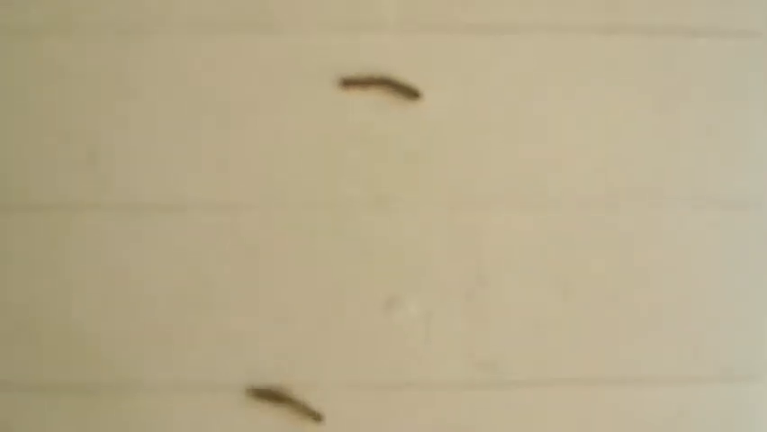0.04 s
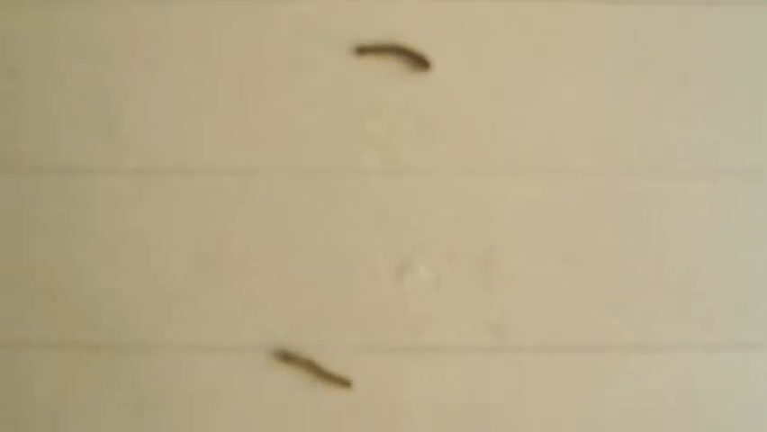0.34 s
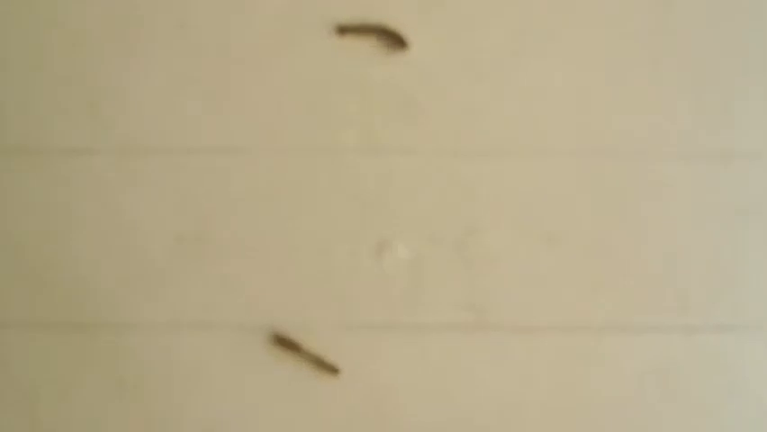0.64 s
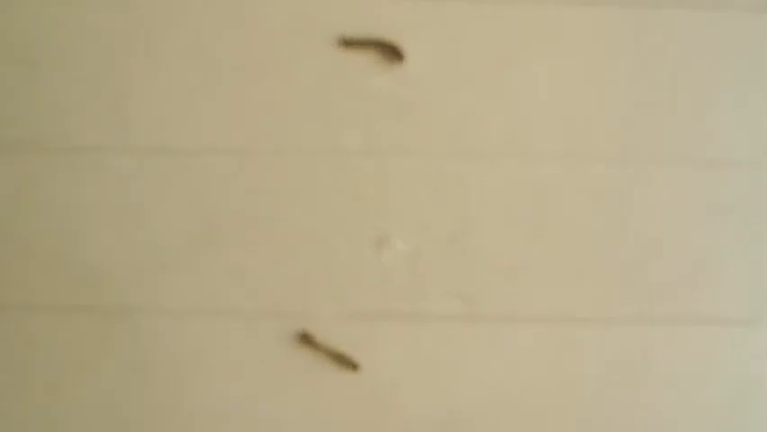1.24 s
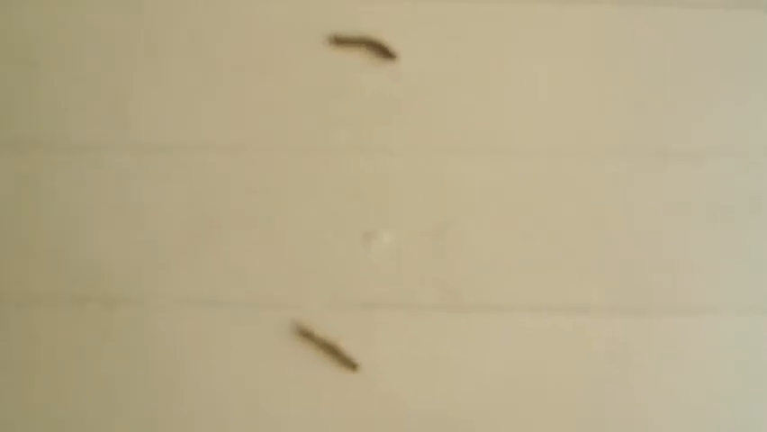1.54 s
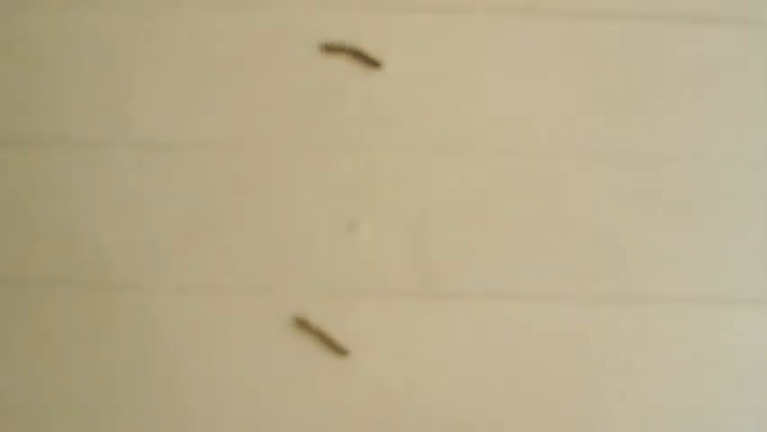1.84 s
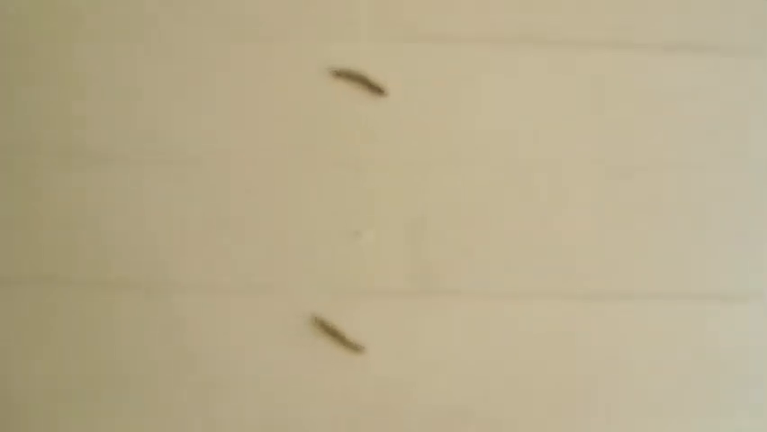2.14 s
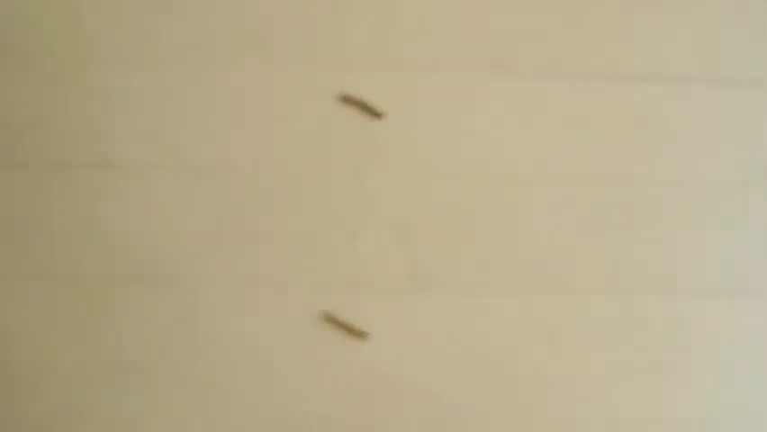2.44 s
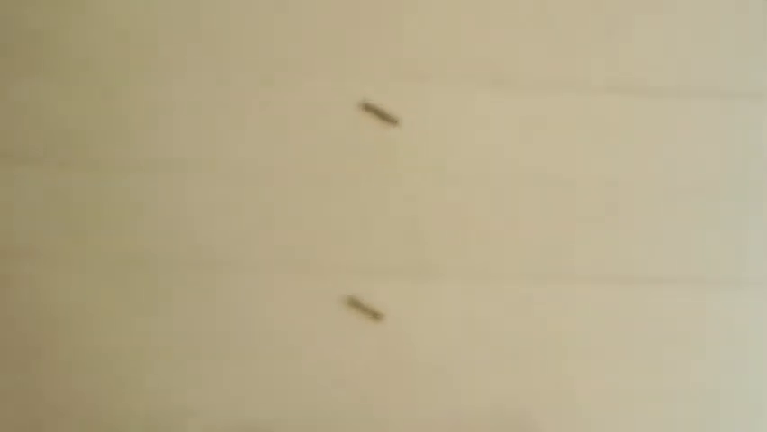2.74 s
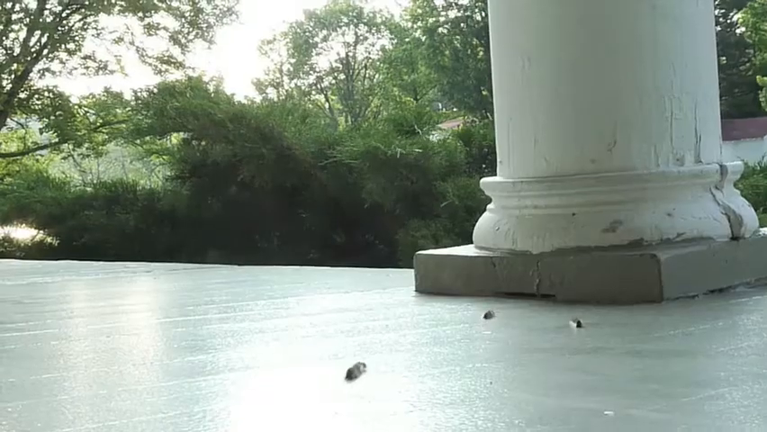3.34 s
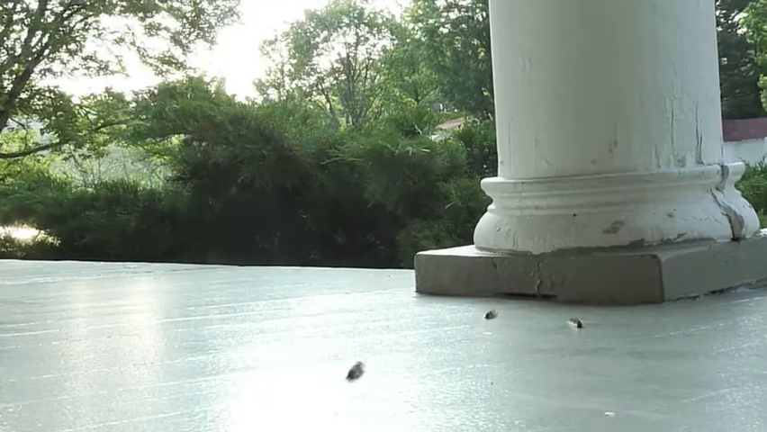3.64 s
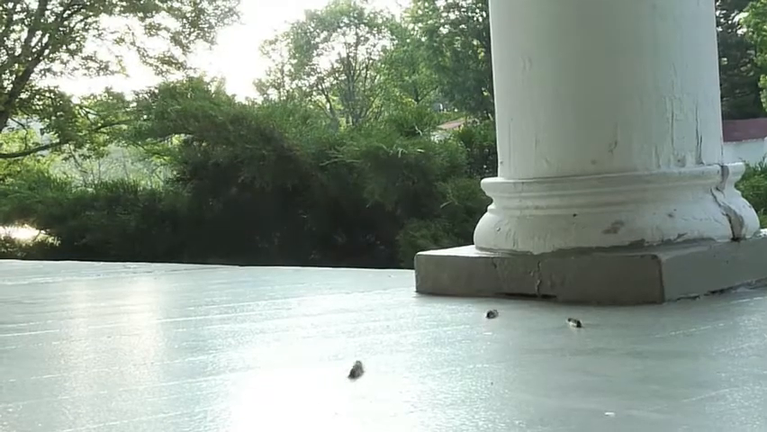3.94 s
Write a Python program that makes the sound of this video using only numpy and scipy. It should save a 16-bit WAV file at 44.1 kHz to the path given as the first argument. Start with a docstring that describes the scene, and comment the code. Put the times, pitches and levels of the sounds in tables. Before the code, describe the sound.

Close plastic clicks from a hand-held camera's controls sound over steady hiss and low outdoor rumble. Several come between 0.4 and 1 second, with the loudest around 2.3 and 2.8. A faint hum sinks in pitch from about 2 to 3 seconds. At 3.1 the background briefly drops out, returning as duller air and low wind. More clicks cluster near 3.3, then soft handling bumps follow from 3.7.

```python
"""On a porch: a small hand-held camera in steady hiss and low outdoor rumble.
Fingers click its controls and ring the plastic shell; hard clicks also push on the microphone.
The electronics whine thinly, and a faint hum sinks in pitch. The background drops out briefly
and returns duller, as distant air and wind, with soft low bumps of handling."""
import sys
import numpy as np
from scipy import signal
from scipy.fft import rfft, irfft
from scipy.io import wavfile
from scipy.ndimage import uniform_filter1d

SR = 44100
rng = np.random.default_rng(int(sys.argv[2]) if len(sys.argv) > 2 else 0)


def store_wav(level_fs):
    """Save 16-bit WAV to argv[1]."""
    pcm = np.round(np.clip(np.atleast_2d(level_fs), -1, 1) * 32767)
    wavfile.write(sys.argv[1], SR, pcm.T.astype(np.int16))


N = 4 * SR


def amp(db):
    """Decibels to gain."""
    return 10 ** (np.asarray(db) / 20)


def unit_rms(x):
    """Scales to an rms of one."""
    return x / np.sqrt(np.mean(x ** 2) + 1e-20)


def curve(points, column=1):
    """Timed points joined linearly, one value a sample."""
    points = np.array(points)
    return np.interp(np.arange(N) / SR, points[:, 0], points[:, column])


def gain_at(hz, spectrum):
    """Gain of a dB curve, interpolated over log frequency."""
    knots_hz, db = np.transpose(spectrum)
    return amp(np.interp(np.log(hz + 1), np.log(knots_hz), db))


def add(mix, start_s, sound):
    """Mixes a sound in at start_s."""
    part = mix[round(start_s * SR):][:len(sound)]
    part += sound[:len(part)]


def noise(spectrum, patch_db=1.55, flicker_db=0.57):
    """Unit-rms coloured noise with drifting patches and a slight broadband flicker."""
    bins = signal.stft(rng.standard_normal(N), nperseg=512)[2]
    patches = uniform_filter1d(rng.standard_normal(bins.shape), size=7, axis=0)
    patches = unit_rms(uniform_filter1d(patches, size=8, axis=1))
    flicker = rng.standard_normal(bins.shape[1])
    white = signal.istft(bins * amp(patch_db * patches + flicker_db * flicker), nperseg=512)[1][:N]
    gain = gain_at(np.fft.rfftfreq(N, 1 / SR), spectrum)
    return unit_rms(irfft(rfft(white) * gain, N))


# Hiss and rumble spectrum: f/Hz, relative density/dB
HISS_SPECTRUM = [(20, -19), (35, -19), (65, -5.5), (115, -0.5), (220, -3.5), (380, -8.5), (800, -11),
                 (1300, -14.5), (1750, -14.5), (2200, -13), (2700, -15.5), (3300, -16), (4000, -25.5),
                 (5000, -35.5), (6700, -36), (7500, -45.5)]
# Hiss envelope: t/s, level/dB
HISS_LEVEL = [(0, -46), (1, -46), (2, -46), (2.75, -46.5), (2.9, -50), (3.03, -49.5), (3.08, -55)]


def hiss():
    """Steady hiss over low outdoor rumble."""
    return amp(curve(HISS_LEVEL)) * noise(HISS_SPECTRUM)


# Whine tones: f/Hz, rms level/dB
WHINE_TONES = [(6222, -91), (6666, -90)]


def whine():
    """Thin steady tones from the electronics."""
    t = np.arange(N) / SR
    return sum(np.sqrt(2) * amp(db) * np.sin(2 * np.pi * hz * t) for hz, db in WHINE_TONES)


# Plastic shell modes: f/Hz, relative level/dB, base t60/s
SHELL_MODES = [(568, -27, 0.011), (1038, -24, .012), (1324, -16, 0.016), (1647, -30, 0.014),
               (2213, -6, 0.011), (2491, -0.7, .011), (2970, -16, 0.0089), (3570, -18.5, 0.0057),
               (4380, -9, 0.0022)]
CONTACT_SAMPLES = 61


def shell_click(db, contact_ms, ring, pitch, rise_s=0.00014):
    """A contact rings the shell: longer is duller, and the finger damps all but a faint after-ring."""
    t = np.arange(SR // 20) / SR
    after_share, after_ring = amp(-18.5), 2.02
    detunes = 1 + 0.0055 * rng.standard_normal(len(SHELL_MODES))
    modes = np.zeros(len(t))
    for (hz, mode_db, t60_s), detune in zip(SHELL_MODES, detunes):
        fall = -np.log(1000) * t / t60_s
        decay = (1 - after_share) * np.exp(fall / ring) + after_share * np.exp(fall / after_ring)
        modes += amp(mode_db) * decay * np.sin(2 * np.pi * hz * pitch * detune * t)
    attack = 1 - np.exp(-t / rise_s)
    contact = signal.windows.gaussian(CONTACT_SAMPLES, contact_ms * SR / 1000)
    return -amp(db) * np.convolve(modes * attack, contact / contact.sum())


def grip_ticks(until_s, per_s=9, spread_db=4.5):
    """The grip ticks faintly on the shell at random times."""
    out = np.zeros(N)
    for when, size in rng.random((int(per_s * until_s), 2)):
        db = -46 + spread_db * (2 * size - 1)
        add(out, when * until_s, shell_click(db, contact_ms=0.056, ring=0.9, pitch=0.96))
    return out


# Control clicks: t/s, drive level/dB, contact sigma/ms, t60 factor, pitch factor
CONTROL_CLICKS = [(.4046, -22, 0.086, 0.82, 0.93), (.5895, -34, .07, .7, 1), (.6393, -13.5, .11, .95, 0.98),
                  (.7020, -13, .108, .85, 0.94), (.9853, -8, 0.054, 1.07, 0.99),
                  (1.367, -34.5, 0.065, .9, 1), (2.186, -35, 0.059, .9, 1.06),
                  (2.2945, -4.5, .039, 0.77, .98), (2.7243, -9.5, 0.061, 1.17, .99),
                  (2.8109, -1.8, .035, .33, 1.04), (2.8551, -8.5, 0.042, .6, 0.98),
                  (3.0436, -30, 0.07, 0.55, 0.76), (3.0946, -21, .015, .25, 1.05),
                  (3.1867, -28.5, 0.046, 0.16, 0.79), (3.2440, -25, 0.066, .9, 0.73),
                  (3.2493, -5.5, 0.036, 0.2, 1), (3.2705, -27.5, 0.03, .5, 0.98),
                  (3.2793, -14.5, 0.034, 0.15, 1.5), (3.2809, -15.5, 0.044, 1, 1.09),
                  (3.2824, -23.5, .04, 0.9, 1.1), (3.3285, -38, .04, 0.35, 1.2)]


def control_clicks():
    """Fingers work the controls; each click rings the shell."""
    out = np.zeros(N)
    for time_s, *strike in CONTROL_CLICKS:
        add(out, time_s - CONTACT_SAMPLES / 2 / SR, shell_click(*strike))
    return out


# Shell-to-microphone response: f/Hz, gain/dB
SHELL_RESPONSE = [(250, -3.5), (700, -.5), (1600, 1.5), (1850, -7), (2030, 3), (2300, 5), (2550, 3),
                  (2780, -1), (3100, 4), (4000, 2), (4900, 0), (5600, -7), (6500, -10), (7700, -16.5)]


def through_shell(x):
    """The path from shell to microphone, as a minimum-phase filter."""
    hz = abs(np.fft.fftfreq(4096, 1 / SR))
    log_gain = np.log(gain_at(hz, SHELL_RESPONSE))
    response = np.exp(np.conj(signal.hilbert(log_gain)))
    taps = np.fft.ifft(response).real[:2048]
    return signal.oaconvolve(x, taps)[:N]


# Pushes on the microphone: t/s, level/dB
MIC_PUSHES = [(.9855, -36), (2.295, -28.5), (2.811, -26.5), (2.854, -46), (3.25, -30.5), (3.279, -27)]


def mic_pushes(rise_s=0.0012, fall_s=0.043, swing_hz=4.2):
    """Hard clicks give the microphone a slow, damped push."""
    out, t = np.zeros(N), np.arange(SR // 2) / SR
    envelope = (1 - np.exp(-t / rise_s)) * np.exp(-t / fall_s)
    push = envelope * np.cos(2 * np.pi * swing_hz * t + np.pi / 4)
    for start_s, db in MIC_PUSHES:
        add(out, start_s, amp(db) * push)
    return out


# Hum glide: t/s, f/Hz, rms level/dB
HUM_GLIDE = [(1.85, 212, -57), (2.05, 208.4, -55.5), (2.25, 193.5, -53), (2.45, 180, -54.5),
             (2.8, 162.7, -58.5), (2.95, 155.3, -66.5)]


def hum(rise_s=0.07):
    """A faint tone fades in and sinks in pitch."""
    t = np.arange(N) / SR
    fade_in = np.clip((t - HUM_GLIDE[0][0]) / rise_s, 0, 1)
    phase = 2 * np.pi * np.cumsum(curve(HUM_GLIDE)) / SR
    return np.sqrt(2) * amp(curve(HUM_GLIDE, column=2)) * np.sin(phase) * fade_in


# Handling bumps: t/s, level/dB, f/Hz, rise/s
HANDLING_BUMPS = [(2.129, -37, 535, 0.0033), (2.13, -39.5, 1220, 0.0012), (3.279, -29, 810, 0.00058),
                  (3.709, -29.5, 163, 0.0041), (3.709, -40, 257, 0.0053), (3.726, -35, 114, 0.0047),
                  (3.798, -30.5, 120, 0.0065), (3.850, -42, 91, 0.0051), (3.969, -34.5, 70, 0.005)]


def handling_bumps():
    """Soft bumps of the hand, each a quickly damped tone."""
    out, t = np.zeros(N), np.arange(SR // 2) / SR
    for start_s, db, hz, rise_s in HANDLING_BUMPS:
        envelope = t / rise_s * np.exp(1 - t / rise_s)
        add(out, start_s, -amp(db) * envelope * np.sin(2 * np.pi * hz * t))
    return out


# Air spectrum: f/Hz, relative density/dB
AIR_SPECTRUM = [(30, -5.5), (120, -2), (300, -3), (600, -6), (1000, -10), (1400, -13), (1900, -16.5),
                (3200, -15), (4300, -25), (5200, -36), (7500, -50)]
# Air envelope: t/s, level/dB
AIR_LEVEL = [(3.11, -60), (3.16, -54), (3.23, -47), (3.29, -53), (3.36, -56.5), (3.5, -53.5), (3.7, -52.5),
             (4, -51.5)]


def distant_air():
    """A dull outdoor wash that swells briefly."""
    return amp(curve(AIR_LEVEL)) * noise(AIR_SPECTRUM)


# Wind spectrum: f/Hz, relative density/dB
WIND_SPECTRUM = [(15, -13), (30, 0.5), (70, -1.5), (130, -4.5), (220, -17), (500, -45), (1500, -86)]
# Wind envelope: t/s, level/dB
WIND_LEVEL = [(3.12, -50.5), (3.24, -45.5), (3.33, -51.5), (3.47, -57), (3.65, -47.5), (3.85, -49),
              (4, -47.5)]


def wind():
    """Low wind rumble, rising and falling."""
    return amp(curve(WIND_LEVEL)) * noise(WIND_SPECTRUM)


def mic_hiss(level_db=-68.5, flat_to_hz=6700):
    """Faint steady hiss of the microphone."""
    return amp(level_db) * noise([(1000, 0), (flat_to_hz, 0), (7500, -7)])


def scene():
    """Clicks and handling over a background that drops out and returns duller; mono."""
    t = np.arange(N) / SR
    cut_s, resume_s, fade_out_s, fade_in_s = 3.102, 3.104, 0.038, 0.048
    before = np.clip((cut_s - t) / fade_out_s, 0, 1) * (hiss() + whine() + hum())
    after = np.clip((t - resume_s) / fade_in_s, 0, 1) * (distant_air() + wind() + mic_hiss())
    clicks = through_shell(control_clicks() + grip_ticks(until_s=cut_s))
    return (before + after + clicks + mic_pushes() + handling_bumps())[None]


def record(dry):
    """The camera's narrow band limit."""
    cutoff_hz = 7680
    lowpass = signal.firwin(401, cutoff_hz, window=("kaiser", 8), fs=SR)
    return signal.oaconvolve(dry, lowpass[None], "same")


dry = scene()
out = record(dry)
store_wav(out)
```